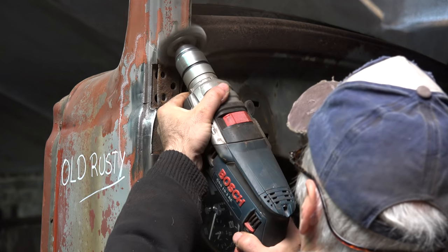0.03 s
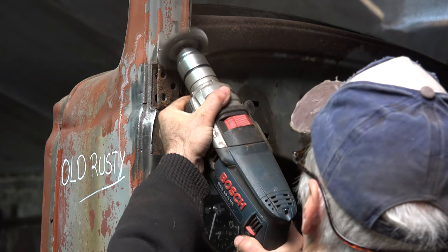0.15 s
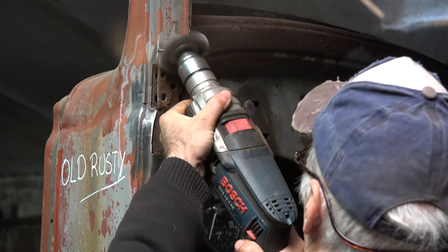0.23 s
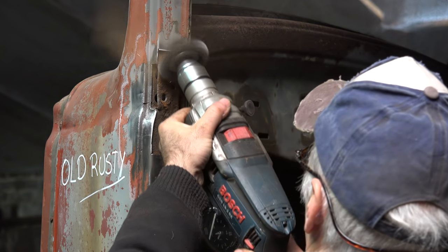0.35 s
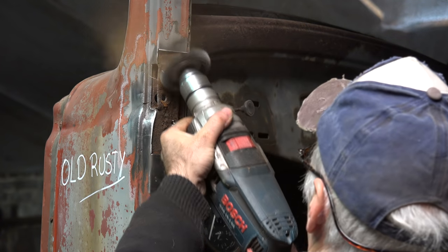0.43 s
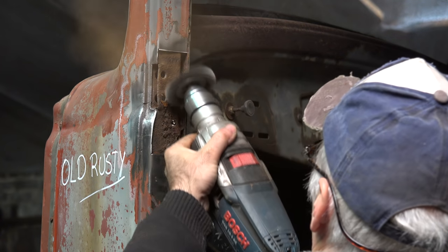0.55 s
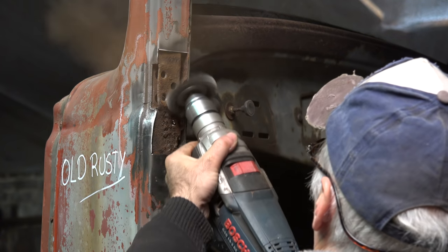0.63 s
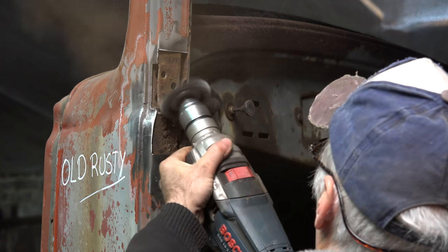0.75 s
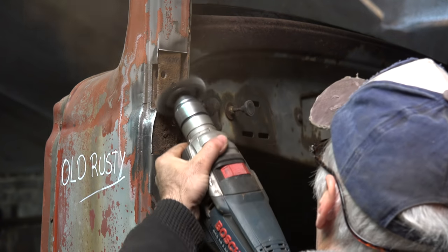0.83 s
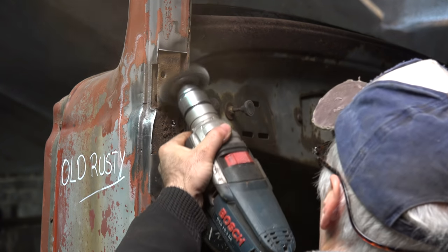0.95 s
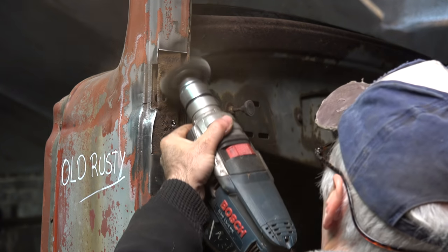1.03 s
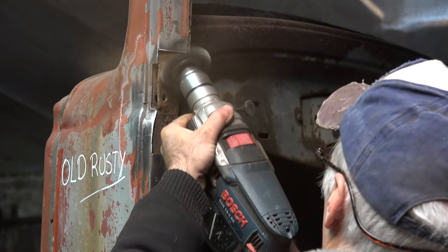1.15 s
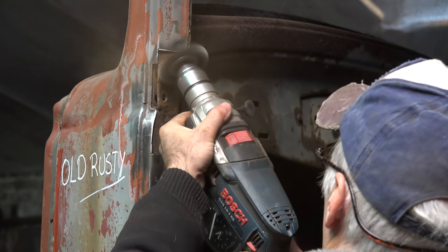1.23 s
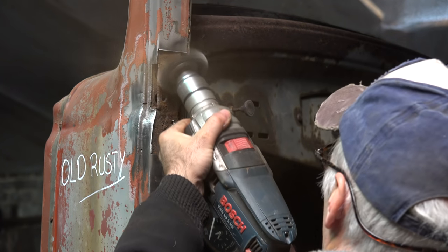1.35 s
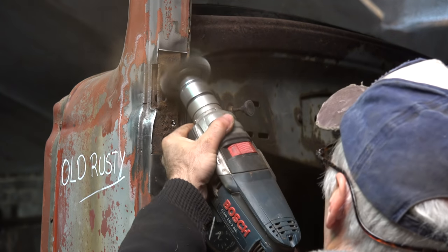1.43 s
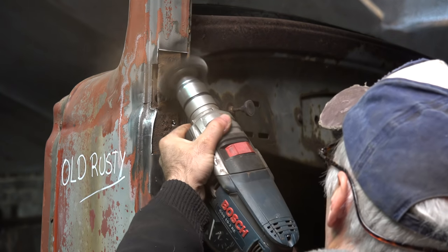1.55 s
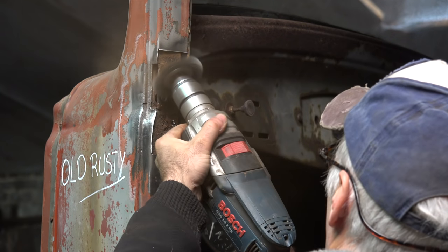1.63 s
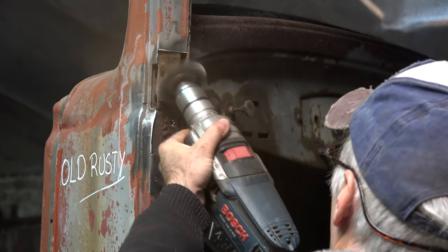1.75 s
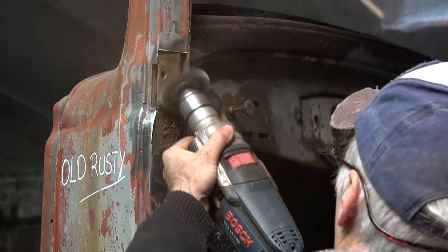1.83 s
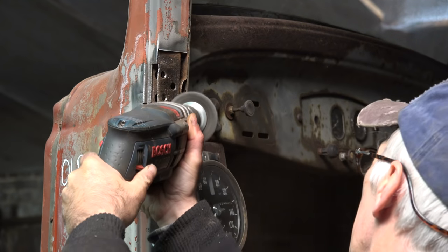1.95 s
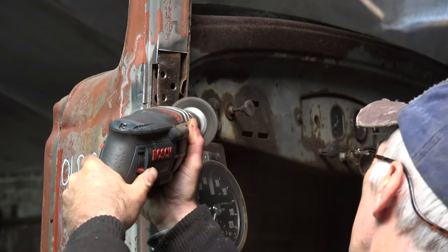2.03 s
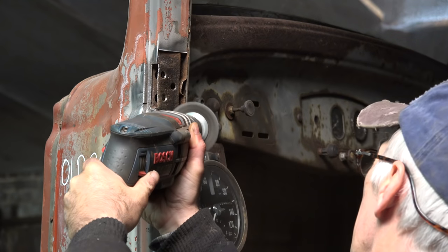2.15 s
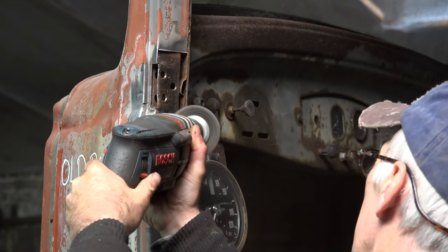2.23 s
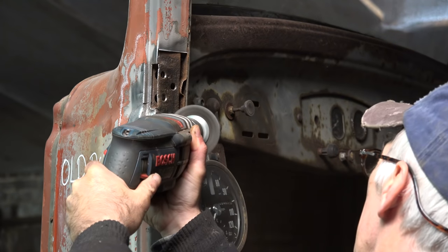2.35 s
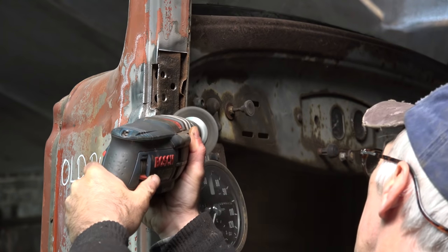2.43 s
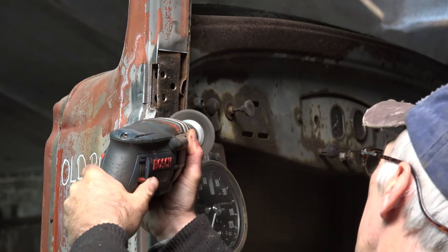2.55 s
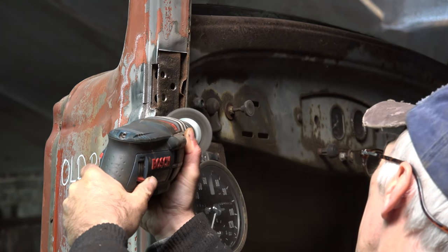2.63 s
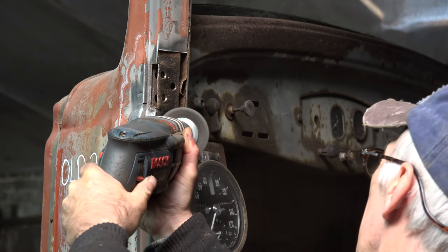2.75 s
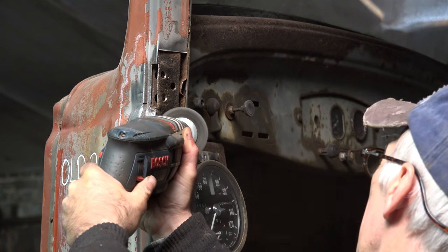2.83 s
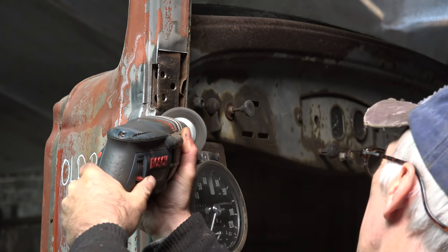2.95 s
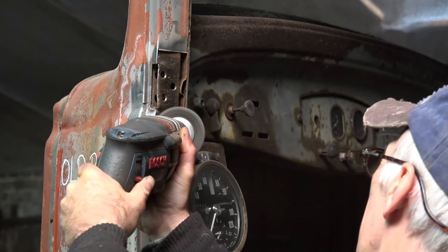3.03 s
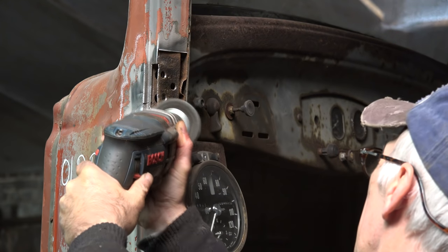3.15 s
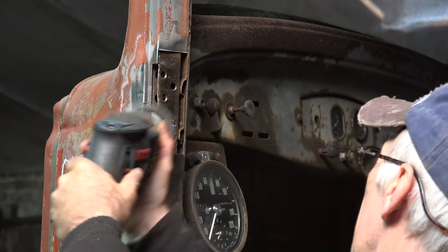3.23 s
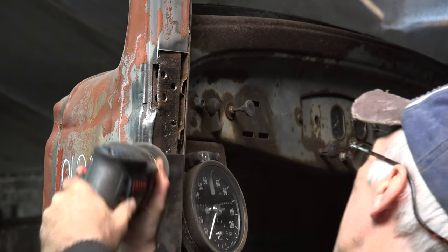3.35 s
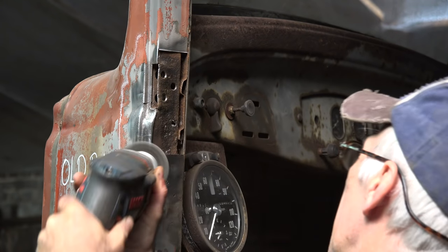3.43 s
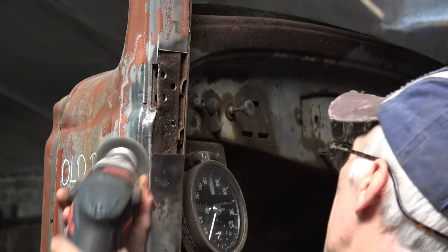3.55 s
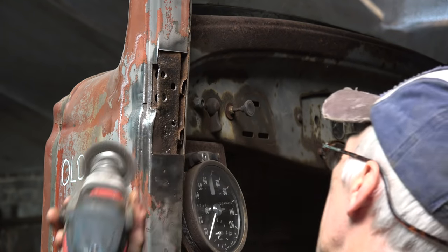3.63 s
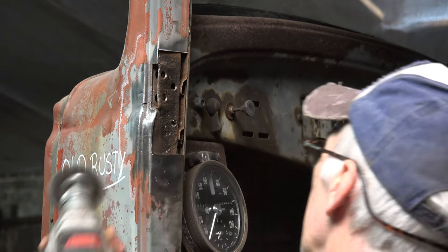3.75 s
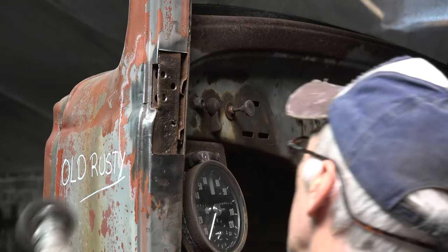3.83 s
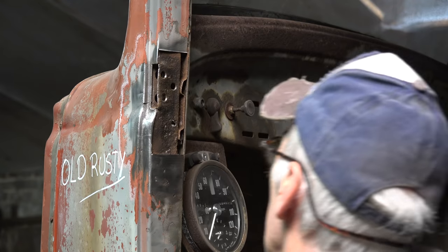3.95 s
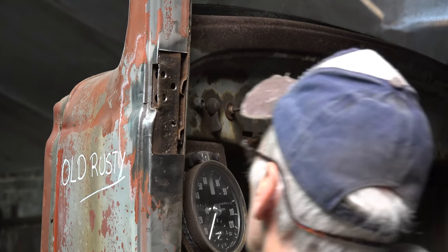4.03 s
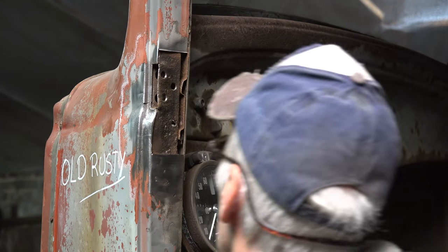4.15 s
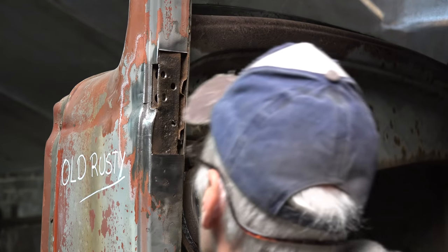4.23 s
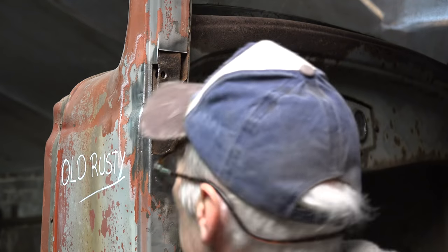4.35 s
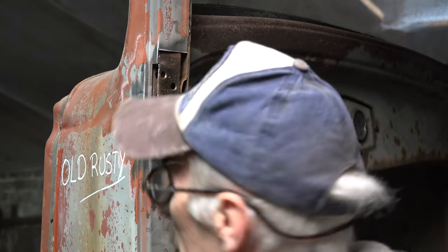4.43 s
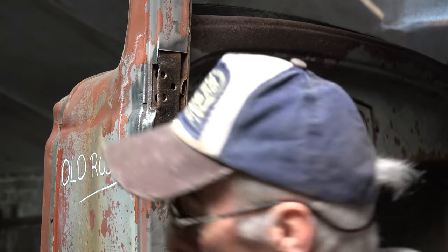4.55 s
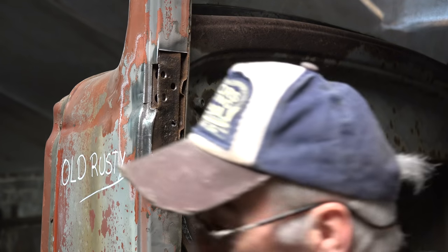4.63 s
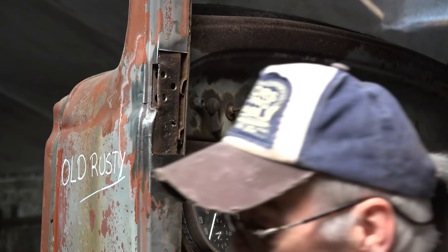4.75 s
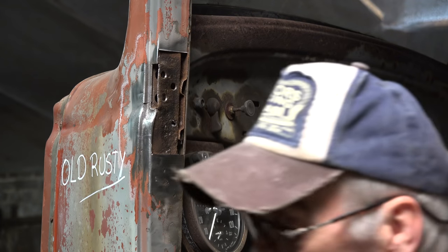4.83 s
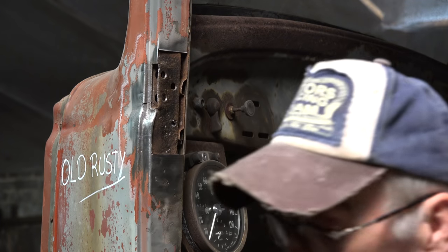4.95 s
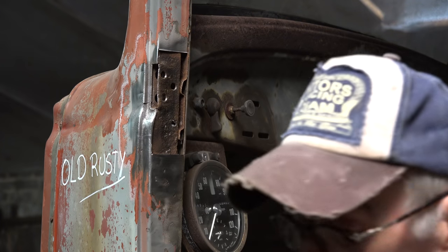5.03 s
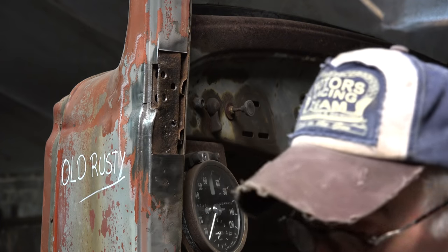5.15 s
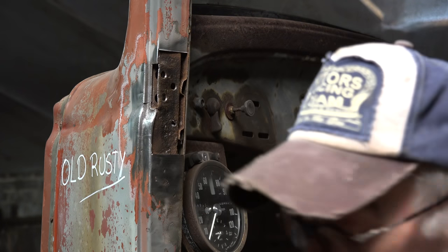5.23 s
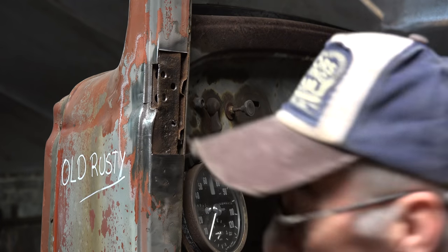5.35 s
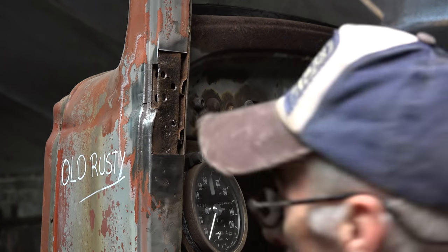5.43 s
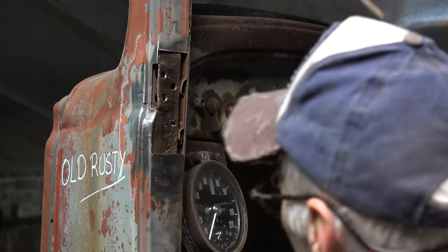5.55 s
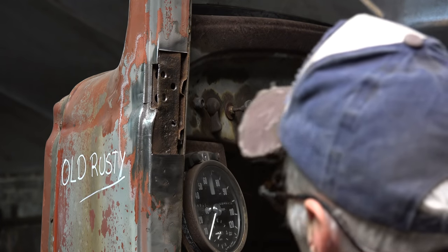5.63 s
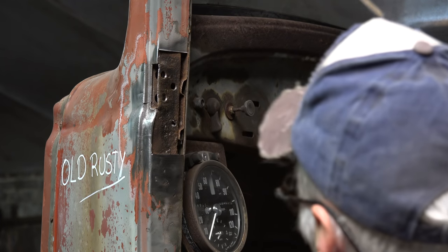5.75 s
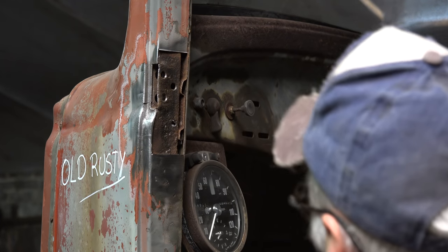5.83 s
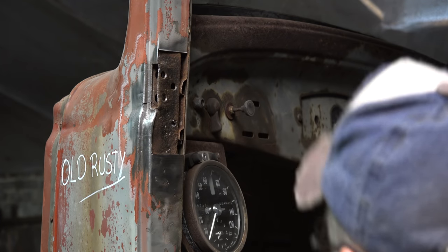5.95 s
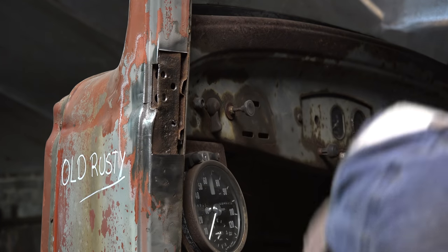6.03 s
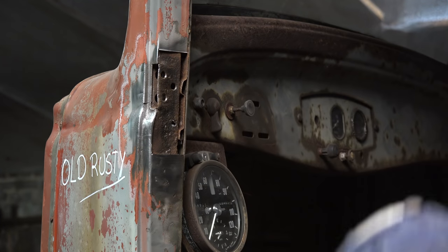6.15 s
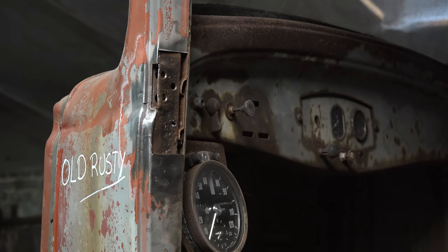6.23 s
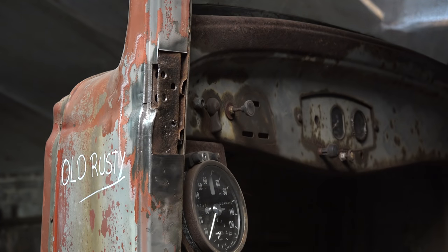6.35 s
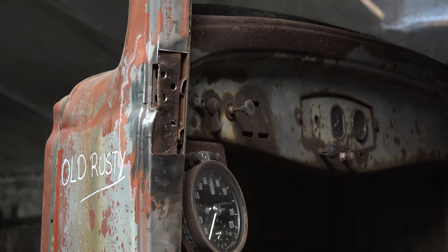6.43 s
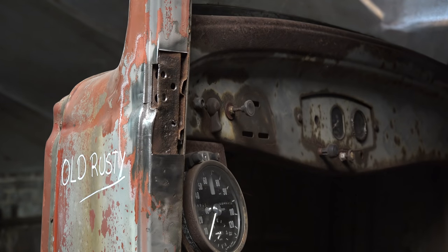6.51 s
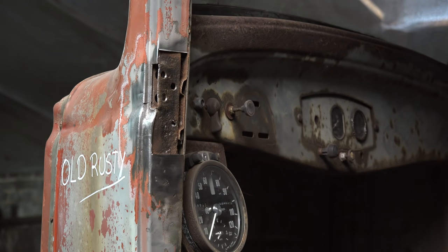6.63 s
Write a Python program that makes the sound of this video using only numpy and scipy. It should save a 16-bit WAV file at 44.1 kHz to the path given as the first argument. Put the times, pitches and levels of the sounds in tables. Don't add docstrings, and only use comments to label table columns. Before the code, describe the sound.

A wire wheel on an electric drill scours rusty sheet metal, knocks the panel, then lifts off and whines down to a stop in a quiet workshop.

```python
import sys
import numpy as np
from scipy import signal
from scipy.io import wavfile
from scipy.ndimage import uniform_filter1d

SR = 44100
rng = np.random.default_rng(int(sys.argv[2]) if len(sys.argv) > 2 else 0)


def dump_mix(stems):
    frames = np.atleast_2d(stems).T
    limited = np.clip(frames, -1, 1)
    pcm = np.round(limited * 32767).astype(np.int16)
    wavfile.write(sys.argv[1], SR, pcm)


def field_ratio(decibels):
    return 10 ** (np.asarray(decibels, dtype=float) / 20)


N = 294588
T = np.arange(N) / SR
EDGE_HZ = 15830

# pitch_hz, level_db_per_hz
SPOT_SPECTRA = [
    [(150, -33), (250, -20.5), (359, -9.5), (823, -4), (995, -3.5), (1330, -2), (1510, -5), (1820, -1.5),
     (2570, -6), (3570, 1), (6100, -6), (10600, -6), (15500, -12.5)],
    [(150, -52.5), (250, -19), (458, -9), (852, -3.5), (929, -10), (995, -4.5), (1220, -4.5), (1510, -9),
     (1640, -7.5), (3510, -10.5), (4630, -6), (8620, -6.5), (15500, -9)],
]
# pitch_hz, level_db_per_hz
BOOM_SPECTRUM = [(15, -58), (25, -13.5), (70, -11.5), (119, -13.5), (157, -9.5), (271, -5.5), (354, -4),
                 (430, -2), (700, 1), (910, -34), (1540, -120)]
SCOUR_DB, BOOM_DB = (-12.5, -15), (-30, -39.5)
SHADE_HZ, SHADE_DB = 11100, -5.5
MOVED_S, LIFT_S = 2.033, (3.3, 3.42)

# start_s, speed_turns_per_s
LOADED_SPEED = [(0, 461.5), (.15, 455.4), (.55, 453), (.75, 461), (.93, 472), (1.12, 474.2), (1.35, 470.7),
                (1.55, 463), (1.86, 458), (2.03, 460), (2.1, 465.8), (2.4, 461.5), (3.2, 461),
                (3.42, 485.5), (3.5, 489.1)]
DRAG = 101.5, .1281, .000734
GEAR_RATIO = .0929
FULL_SPEED, SLOWEST = 490, 50
# start_s, press_db (wheel on the panel), aim_db (vents towards the microphone)
GRIP = [(0, 1, -5.5), (.2, -4.5, -5), (.45, 2, -4), (.8, -1.5, 1), (1.2, -14, -1), (1.5, -6, 2.5),
        (1.8, 4, 0), (2.03, -12.5, -2), (2.1, -1, -1), (2.5, -2.5, -4), (2.9, 1, 0), (3.3, -0.5, -3)]
SWAY_DB, SWAY_PEAK_S, SWAY_PERIOD_S, SWAY_STILL_S = 4, 3.92, .6, (4.85, 5.05)

# multiple_of_wheel_turn, level_db
WHEEL_TONES = [(3, -49.5), (5, -48.5), (10, -52.5)]
# multiple_of_armature_turn, first_spot_db, second_spot_db
SIDE_TONES = [(4, -41, -60), (6, -43, -45), (12, -45, -45), (18, -46, -41), (19, -48, -36)]
# multiple_of_wheel_turn, first_spot_db, second_spot_db, share_of_press
WHEEL_HUM = [(2, -41, -62, 0), (4, -32, -38.5, 1), (8, -41, -47, .6)]
# multiple_of_armature_turn, first_spot_db, second_spot_db, share_of_fade, lift_db
UNBALANCE = [(1, -47, -40, .5, 6), (2, -42, -33, .9, -12)]
HUM_FADE_S, HUM_FADE_DB_PER_S = 3.41, 54
# multiple_of_armature_turn, first_spot_db, second_spot_db, share_of_aim
WHINES = [(17, -28.5, -30, 1), (34, -32, -39, -.7), (24, -35, -39, -.7)]
# multiple_of_armature_turn, full_speed_db
BLADES = [(17, -24.5), (34, -27.5)]
BLADE_DB_PER_OCTAVE = 17
# multiple_of_armature_turn, level_db
SLOTS = [(12, -4), (24, 3.5), (36, 0), (48, 4), (49, -4), (60, 0), (72, 2), (84, -1), (96, 2), (108, -2),
         (120, 2), (132, -2), (144, 1), (156, -4), (168, 0), (180, -6), (192, -4), (216, -7)]
BAR_DB, BAR_KNEE, BAR_DB_PER_OCTAVE = -45, 180, 11.5
# pitch_hz, gain_db
CASING = [(600, -9.5), (1300, 6.6), (1900, 10.9), (2700, 0.3), (3600, -1.6), (4500, -3.5), (6000, -1.1),
          (7400, 1.1), (8700, 4.2), (11000, -0.9), (15500, -10.6)]
# peak_s, half_length_s, multiple, gain_db
FLARES = [(3.55, .1, 34, -14), (3.7, .06, 17, -4), (3.85, .1, 17, 4), (3.9, .15, 24, 5), (4.4, .18, 24, 10),
          (4.35, .35, 48, -6), (4.45, .4, 49, -7), (4.55, .1, 12, 7), (4.08, .1, 17, -5), (4.6, .3, 17, 3),
          (4.92, .1, 24, -7), (4.93, .1, 60, -5), (4.95, .1, 48, 3), (4.97, .1, 72, -5), (5.14, .08, 24, 5),
          (5.25, .17, 12, -10), (5.28, .12, 72, 4), (5.36, .1, 48, 10), (5.43, .1, 24, -6),
          (5.12, .15, 36, 4), (5.57, .08, 48, -10), (5.7, .1, 24, 4), (5.82, .1, 48, 4), (5.9, .1, 24, 5),
          (6.1, .16, 48, 10)]

# start_s, level_db
RUNDOWN = [(3.4, -17.5), (3.74, -20), (4.27, -23), (4.92, -34.5), (5.11, -38), (5.55, -44), (5.9, -52),
           (6.2, -56.5), (6.42, -72)]
LAYERS = {"air": (0.1, 0.073), "rattle": (-4.5, 3.65), "hiss": (-1.2, 0.37), "rumble": (-24.5, 4)}
# pitch_hz, level_db_per_hz
AIR_SPECTRUM = [(1470, -16), (2500, -10), (3290, -6.5), (3560, -5.5), (4250, -1.5), (5860, -3.5),
                (6350, -4), (9000, -9), (11700, -35), (19800, -120)]
# pitch_hz, level_db_per_hz
RATTLE_FAST = [(180, -35), (300, -9.5), (450, -5.5), (571, -3), (631, -3.5), (1080, -1), (1460, -4),
               (3020, -14.5), (3200, -12.5), (4160, -36), (7040, -120)]
# pitch_hz, level_db_per_hz
RATTLE_SLOW = [(180, -21), (300, -7.5), (459, -10.5), (624, -5.5), (776, -7.5), (1020, -4), (1480, -8.5),
               (1620, -10), (3200, -17), (4160, -35), (7040, -120)]
# pitch_hz, level_db_per_hz
HISS_SPECTRUM = [(3820, -40), (6500, -13), (10200, -1.5), (11100, -1.5), (13900, -4.5), (15500, -3.5)]
# pitch_hz, width_hz, gain_db
CASE_RINGS = [(5500, 350, 5), (8700, 600, 8), (11800, 400, 9)]
# peak_s, half_length_s, pitch_hz, width_hz, gain_db
VENTS = [
    (3.52, 0.21, 9100, 2500, 9.5),
    (3.9, 0.19, 1400, 450, 6),
    (4.55, .25, 1547, 500, -6),
    (4.78, 0.29, 8700, 900, 8),
    (5.9, 0.75, 2000, 900, 13),
]

# start_s, peak_db, low_mode_db, high_mode_db
KNOCKS = [
    (0.765, 1.5, -14.5, 6),
    (0.789, 0, 8, 2),
    (0.807, -2, -10, 3.5),
    (0.847, -5.5, 5.5, 2.5),
    (0.904, -7, 2.5, -18),
    (0.97, -13.5, -4, -10),
    (1.348, -26.5, -6, 7),
]
# pitch_hz, level_db, t60_s
PANEL_MODES = [(84.3, -21, 0.4), (212.7, -6, .15), (299, -3, 0.088), (360.5, 5, 0.09), (490, -0.5, 0.053),
               (636, -2.5, 0.062), (1620, 0.5, 0.013)]
# start_s, peak_db, pitch_hz
TICKS = [
    (5.241, -16, 6420),
    (5.3274, -34, 4420),
    (5.439, -20, 5290),
    (5.5994, -34, 4190),
    (6.0067, -30, 4270),
    (6.3684, -40, 4870),
]
# start_s, peak_db, pitch_hz
BUMPS = [(3.27, -29, 90), (3.35, -22, 160), (4.416, -24, 447), (4.679, -38, 270), (4.87, -39, 170),
         (5.31, -43, 190), (5.56, -44, 150), (5.885, -46, 264), (5.91, -44, 334), (6.489, -48, 99),
         (6.519, -50, 72), (6.609, -52, 172)]
THUD = 4.63, -35, 66

# pitch_hz, level_db_per_hz
ROOM_SPECTRUM = [(15, -37.5), (25, -10), (43, -12.5), (86, -13), (136, -16), (173, -12.5), (340, -22.5),
                 (4750, -28.5), (15500, -40.5)]
ROOM_DB = -60


def wires(turns):
    wheel = 2 * np.pi * GEAR_RATIO * turns
    throb = 1 + 0.027 * np.cos(wheel) + 0.036 * np.cos(4 * wheel)

    def spot(hz, s):
        second = read(SPOT_SPECTRA[1], hz) + SHADE_DB * (hz > SHADE_HZ)
        return np.where(s < MOVED_S, read(SPOT_SPECTRA[0], hz), second)

    scour = field_ratio(by_spot(*SCOUR_DB)) * coloured(throb * scratches(2500, 3.0, 0.32), spot, 0.93)
    boom = field_ratio(by_spot(*BOOM_DB)) * steady_noise(BOOM_SPECTRUM, 1.5)
    return (scour + boom) * np.interp(T, LIFT_S, (1, 0)) ** .5


def wheel_tones(turns, speed):
    press_db, _ = curves(GRIP)
    fade_db = -HUM_FADE_DB_PER_S * np.maximum(T - HUM_FADE_S, 0)
    scouring = T < LIFT_S[1]
    out = np.zeros(N)
    for k, a, b, share in WHEEL_HUM:
        out += tone(turns, speed, k * GEAR_RATIO, by_spot(a, b) + share * press_db + fade_db, 2.8)
    for k, a, b, share, lift_db in UNBALANCE:
        out += tone(turns, speed, k, by_spot(a, b) + share * fade_db + lift_db * lifted(), 2.0)
    for k, db in WHEEL_TONES:
        out += scouring * tone(turns, speed, k * GEAR_RATIO, db, 4.0)
    for k, a, b in SIDE_TONES:
        out += scouring * tone(turns, speed, k, by_spot(a, b), 4, blur=.05)
    return out


def motor(turns, speed):
    _, aim_db = curves(GRIP)
    swing = np.cos(2 * np.pi * (T - SWAY_PEAK_S) / SWAY_PERIOD_S)
    sway_db = SWAY_DB * np.interp(T, SWAY_STILL_S, (1, 0)) * swing
    bar_db = BAR_DB + sway_db + BAR_DB_PER_OCTAVE * np.minimum(np.log2(speed / BAR_KNEE + .01), 0)
    blade_db = 0.53 * sway_db + BLADE_DB_PER_OCTAVE * np.log2(speed / FULL_SPEED + .01)
    running_free, loaded = np.zeros(N), np.zeros(N)
    for k, db in BLADES:
        running_free += tone(turns, speed, k, db + blade_db + flare_db(k), 2.9, blur=.05, per_s=16)
    for k, db in SLOTS:
        waver_db, blur = (2.2, .08) if k < 49 else (4.5, .14)
        level_db = db + bar_db + flare_db(k) + read(CASING, k * speed)
        running_free += tone(turns, speed, k, level_db, waver_db, blur, per_s=16)
    for k, a, b, share in WHINES:
        loaded += tone(turns, speed, k, by_spot(a, b) + share * aim_db, 2.8, blur=.05, per_s=25)
    free = lifted()
    whine = free * running_free + np.sqrt(1 - free ** 2) * loaded
    return whine * (1 + .35 * np.cos(2 * np.pi * turns))


def armature():
    s, speed = map(list, zip(*LOADED_SPEED))
    step_s = .002
    while s[-1] < T[-1]:
        slowing = np.polyval(DRAG[::-1], speed[-1])
        speed.append(max(speed[-1] - step_s * slowing, 0))
        s.append(s[-1] + step_s)
    return np.interp(T, s, speed)


def coasting(turns, speed):
    level_db, = curves(RUNDOWN, after=-76)
    slowed = np.log2(FULL_SPEED / (speed + SLOWEST))
    air_db, rattle_db, hiss_db, rumble_db = (level_db + db + gain_db * slowed for db, gain_db in LAYERS.values())

    def slow(s):
        return np.clip(1.2 - np.interp(s, T, speed) / 280, 0, 1)

    def in_case(spectrum):
        return lambda hz, s: read(spectrum, hz) + casing_db(hz, s, slow(s))

    def shell(hz, s):
        mixed = (1 - slow(s)) * read(RATTLE_FAST, hz) + slow(s) * read(RATTLE_SLOW, hz)
        return mixed + casing_db(hz, s, slow(s))

    teeth = (1 + 0.091 * np.cos(2 * np.pi * turns)) * scratches(900, 2.4, 0.28)
    out = field_ratio(rattle_db) * coloured(teeth, shell, 0.44)
    out += field_ratio(air_db) * coloured(scratches(1500, 6.0, 0.24), in_case(AIR_SPECTRUM), 0.72)
    out += field_ratio(hiss_db - 1.5) * coloured(rng.standard_normal(N), in_case(HISS_SPECTRUM), 0.78)
    out += field_ratio(rumble_db) * steady_noise(BOOM_SPECTRUM, 0.7)
    return out * lifted()


def casing_db(hz, s, slow):
    def bell(f, width):
        return 1 / (1 + (2 * (hz - f) / width) ** 2)

    rings = slow ** 4 * sum(db * bell(f, width) for f, width, db in CASE_RINGS)
    return rings + sum(db * bell(f, width) * np.exp(-((s - at) / half) ** 2) for at, half, f, width, db in VENTS)


def knocks():
    out = np.zeros(N)
    for s, db, low_db, high_db in KNOCKS:
        for hz, mode_db, t60 in PANEL_MODES:
            bounce_db = db - 7.5 + mode_db + low_db * (hz < 300) + high_db * (hz > 500)
            strike(out, s, bounce_db, hz, t60, rise=0.0011)
    return without_bass(out)


def gear_lash():
    out = np.zeros(N)
    for s, db, hz in TICKS:
        strike(out, s, db - 4, hz, .005, rise=.0002)
        strike(out, s, db + 4, 8000, .001, rise=.00003)
    return without_bass(out)


def handling():
    out = np.zeros(N)
    for s, db, hz in BUMPS:
        strike(out, s, db, hz, .09, rise=0.0031)
    strike(out, *THUD, .3, rise=.04)
    return without_bass(out)


def hush():
    return field_ratio(ROOM_DB) * steady_noise(ROOM_SPECTRUM, 1.5)


def strike(mix, s, db, hz, t60, rise):
    part = mix[round(s * SR):][:SR // 2]
    t = T[:len(part)]
    part += field_ratio(db - 60 * t / t60) * np.minimum(t / rise, 1) * np.sin(2 * np.pi * hz * t)


def without_bass(x):
    return signal.sosfilt(signal.butter(3, 65, "high", fs=SR, output="sos"), x)


def tone(turns, speed, multiple, db, waver_db, blur=0., per_s=20):
    heard = multiple * speed < EDGE_HZ
    phase = multiple * turns + rng.random() + (blur * wander(150) if blur else 0)
    return heard * np.sqrt(2) * field_ratio(db + waver_db * wander(per_s)) * np.sin(2 * np.pi * phase)


def flare_db(multiple):
    return sum(db * np.exp(-((T - s) / half) ** 2) for s, half, k, db in FLARES if k == multiple)


def scratches(per_s, spread_db, share):
    sizes = field_ratio(spread_db * rng.exponential(1, N).clip(0, 4))
    clicks = rng.standard_normal(N) * sizes * (rng.random(N) < per_s / SR)
    return evened((1 - share) * rng.standard_normal(N) + share * evened(clicks))


def coloured(x, colour_db, patchy_db):
    hz, s, z = signal.stft(x, SR, nperseg=1024, noverlap=768)
    gain = field_ratio(colour_db(hz[:, None], s)) * np.ones(z.shape)
    gain /= np.sqrt((gain ** 2).mean(0))
    patches = uniform_filter1d(rng.standard_normal(z.shape), size=12, axis=0)
    patches = evened(uniform_filter1d(patches, size=10, axis=1))
    return signal.istft(z * gain * field_ratio(patchy_db * patches), SR, nperseg=1024, noverlap=768)[1][:N]


def steady_noise(spectrum, patchy_db):
    return coloured(rng.standard_normal(N), lambda hz, s: read(spectrum, hz), patchy_db)


def read(points, hz):
    f, value = np.transpose(points)
    return np.interp(np.log(np.minimum(hz, EDGE_HZ - 330) + 1), np.log(f + 1), value)


def curves(rows, before=None, after=None):
    s, *columns = np.transpose(rows)
    return [np.interp(T, s, c, before, after) for c in columns]


def wander(per_s):
    knots = np.arange(1200)
    return 1.22 * np.interp(T * per_s, knots, rng.standard_normal(len(knots)))


def evened(x):
    return x / np.sqrt(np.mean(x ** 2) + 1e-20)


def lifted():
    return np.interp(T, LIFT_S, (0, 1)) ** .5


def by_spot(first, second):
    return np.where(T < MOVED_S, first, second)


def scene():
    speed = armature()
    turns = np.cumsum(speed) / SR
    drill = wires(turns) + wheel_tones(turns, speed) + motor(turns, speed) + coasting(turns, speed)
    mono = drill + knocks() + gear_lash() + handling() + hush()
    return np.array([mono, mono])


def roll_off(x):
    return signal.sosfilt(signal.butter(12, 17090, fs=SR, output="sos"), x)


def record(dry):
    power_db = 10 * np.log10(abs(uniform_filter1d(dry[0] ** 2, size=600)) + 1e-12)
    fall = T * 60.
    held_db = np.maximum.accumulate(power_db + fall) - fall
    over_db = np.maximum(held_db + 10.5, 0)
    ducked = dry / field_ratio(.7 * uniform_filter1d(over_db, size=200))
    return roll_off(np.tanh(ducked / 1.02) * 1.02)


dry = scene()
out = record(dry)
dump_mix(out)
```